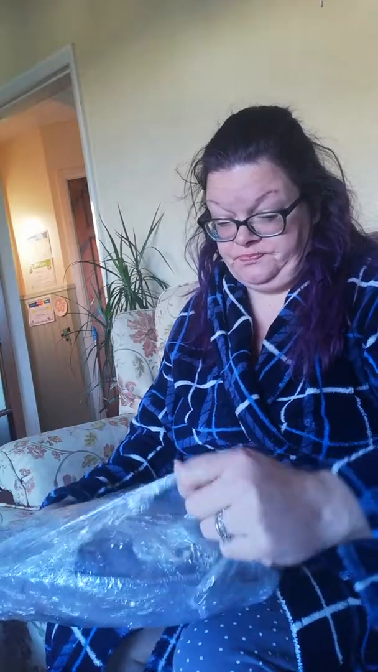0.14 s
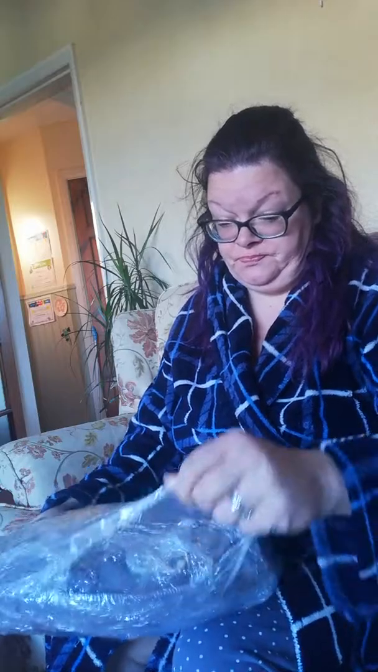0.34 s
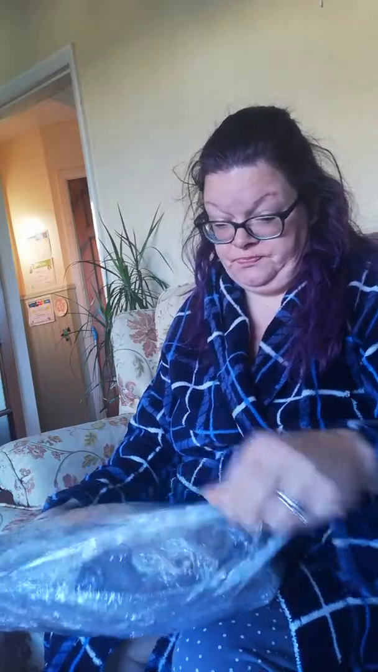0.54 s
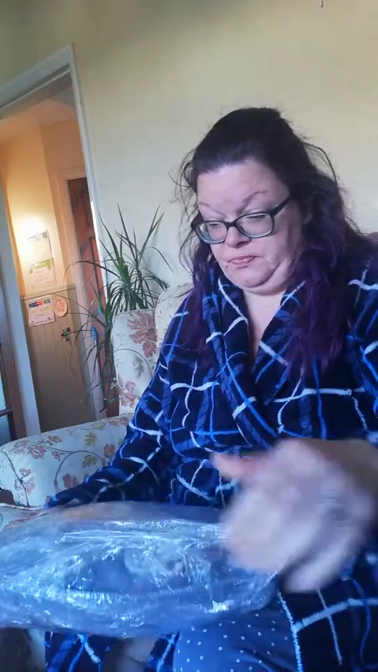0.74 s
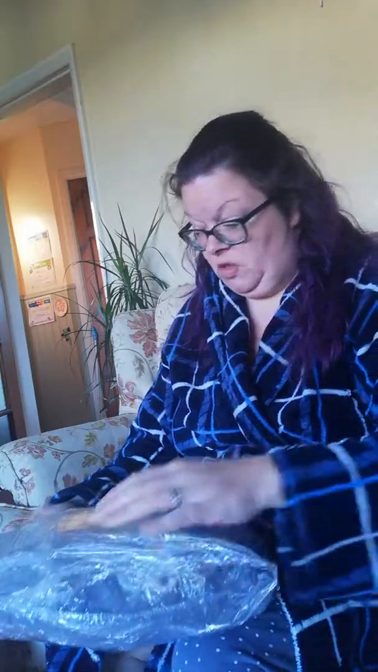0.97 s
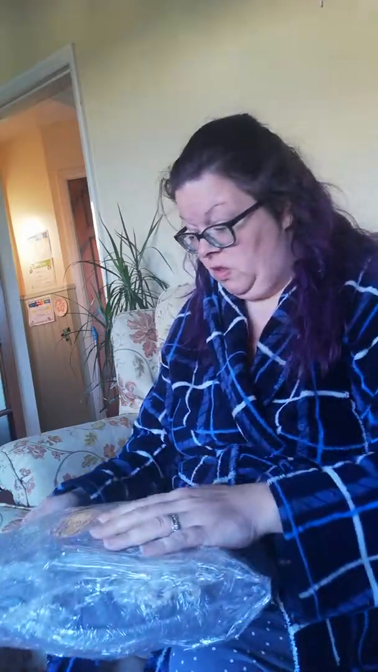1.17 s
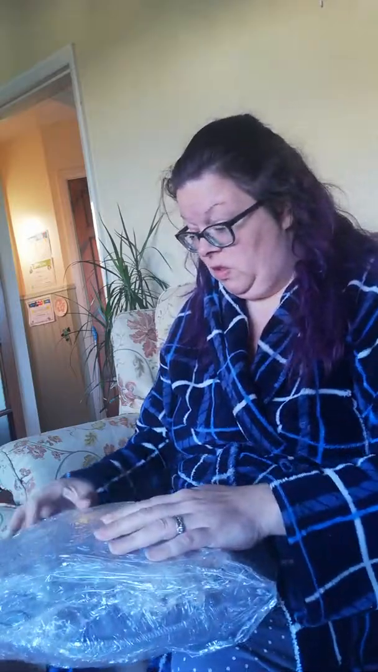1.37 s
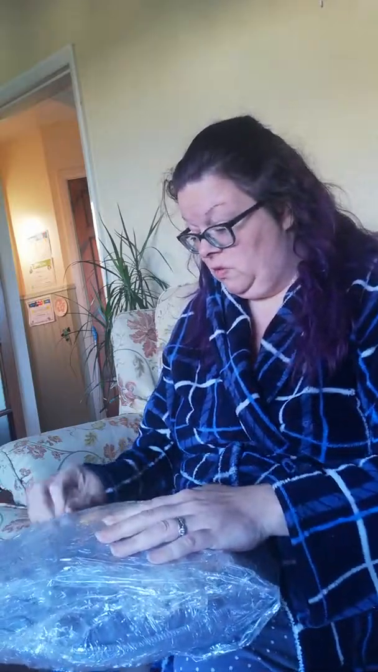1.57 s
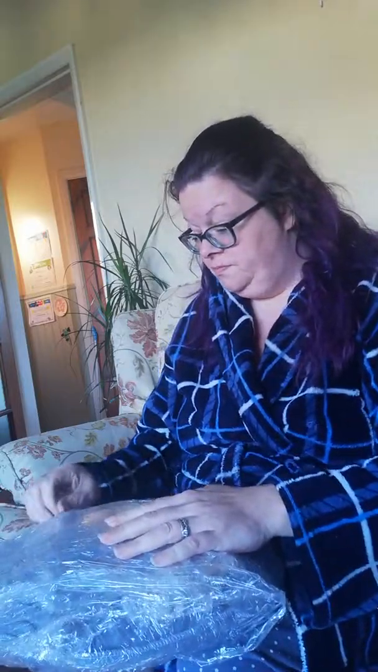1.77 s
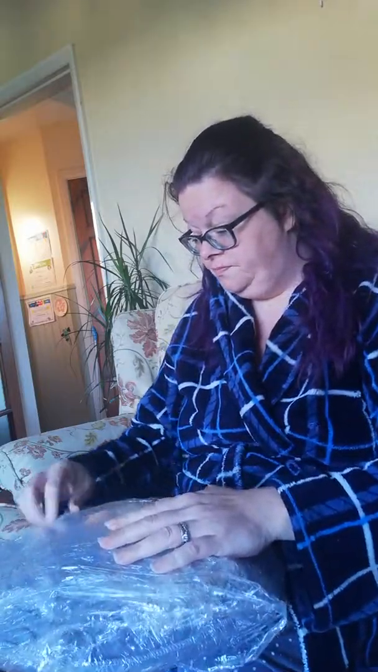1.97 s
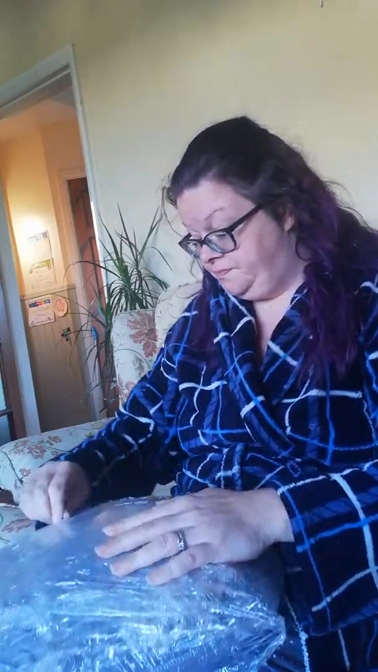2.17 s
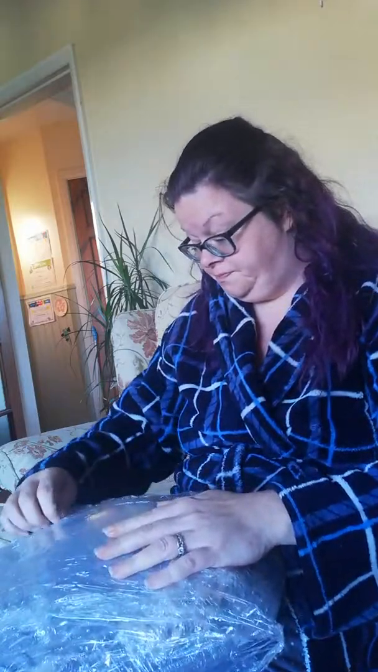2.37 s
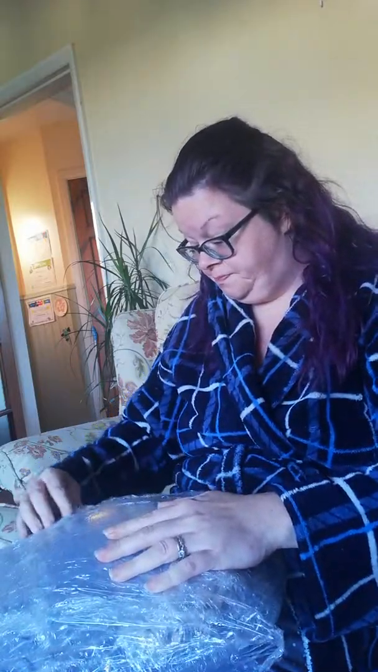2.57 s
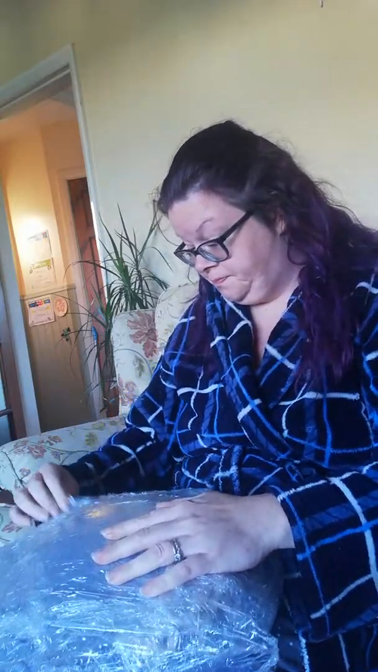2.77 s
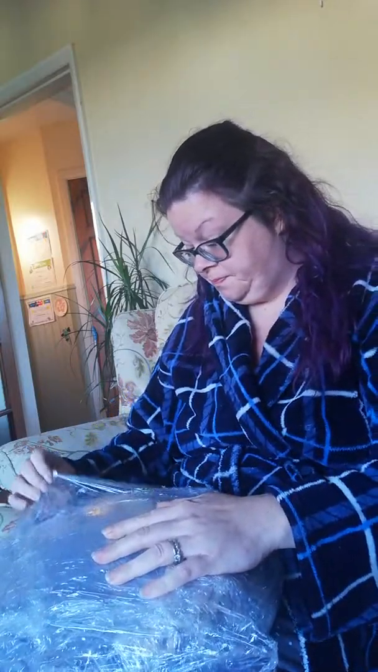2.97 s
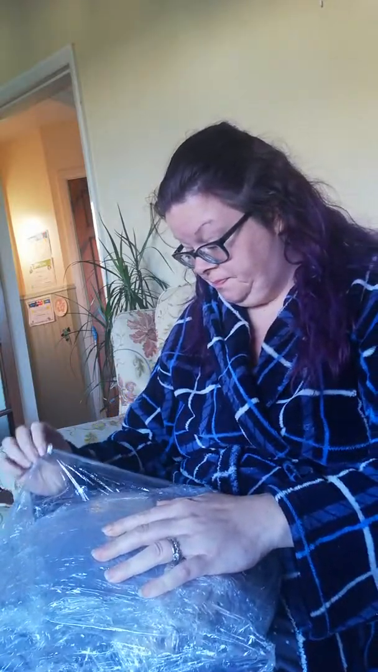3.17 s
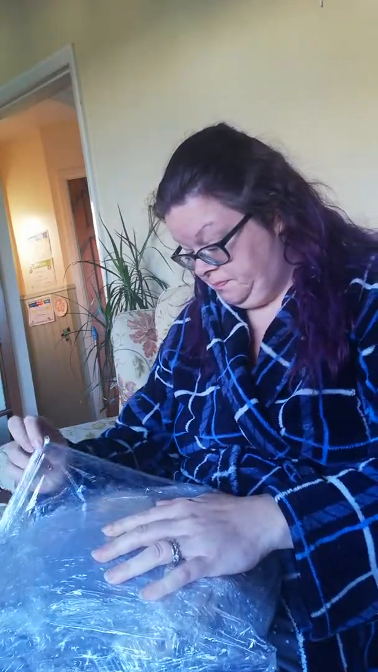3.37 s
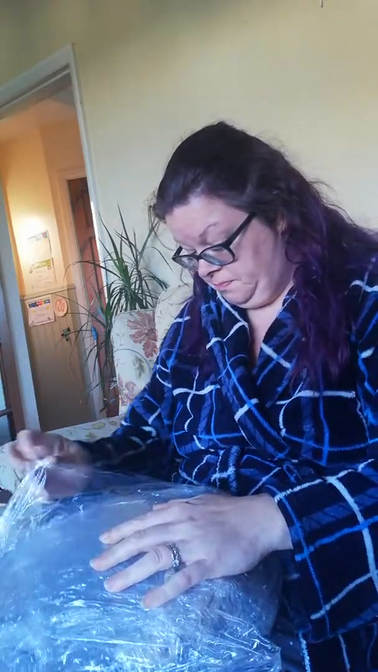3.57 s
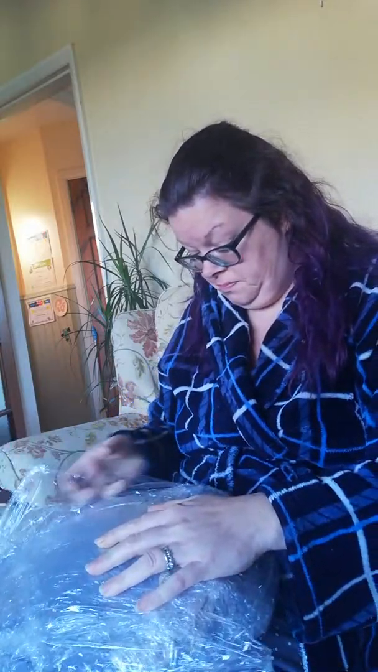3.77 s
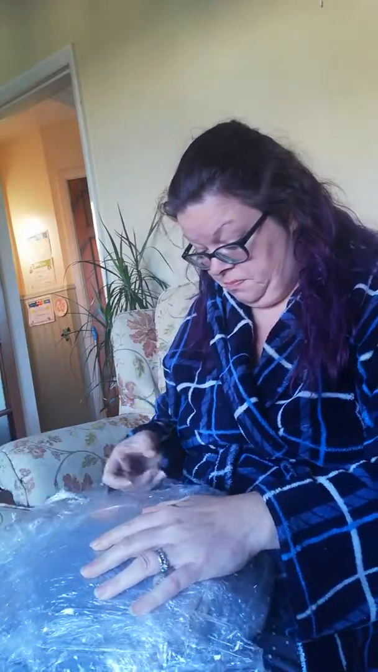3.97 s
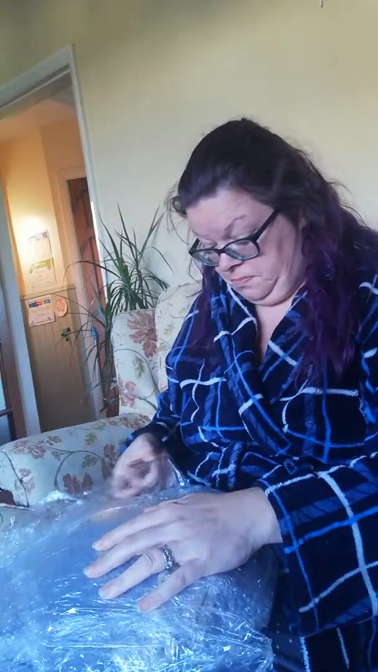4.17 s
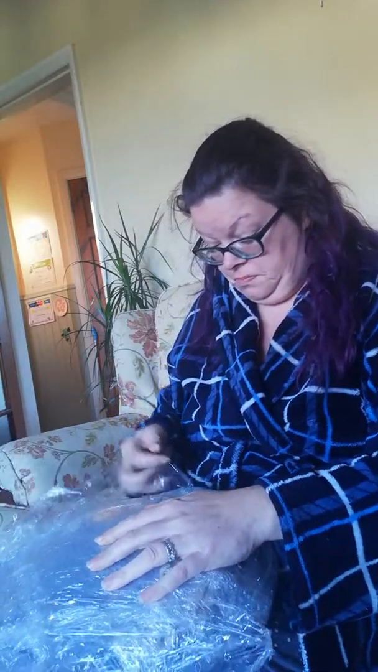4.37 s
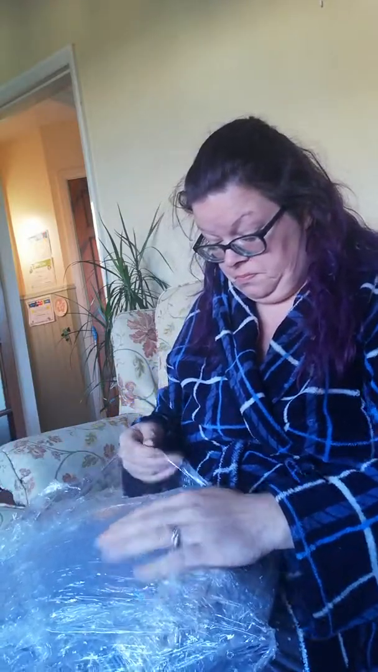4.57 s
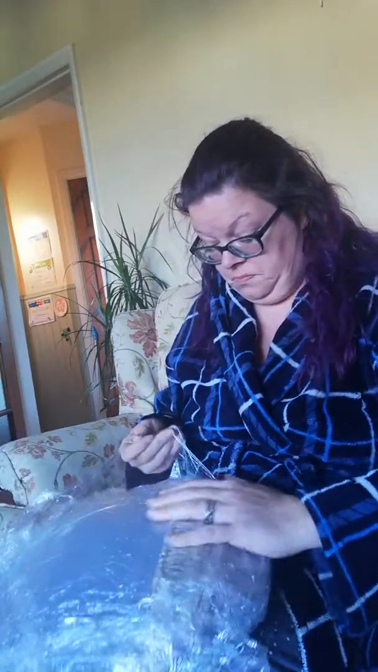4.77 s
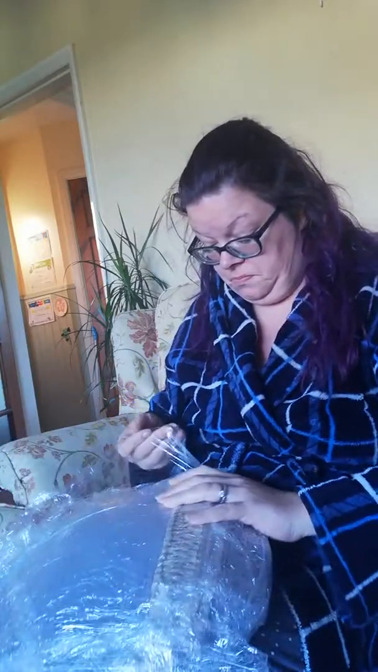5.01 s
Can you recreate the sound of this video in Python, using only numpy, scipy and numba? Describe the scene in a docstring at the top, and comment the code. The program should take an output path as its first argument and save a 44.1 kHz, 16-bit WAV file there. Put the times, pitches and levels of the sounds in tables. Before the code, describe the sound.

Close to a phone in a small furnished living room, hands handle plastic film around a bubble-wrapped parcel. Dense bright crackling and sharp snaps fill the first half second or so, then only faint rustles remain. Near three seconds the crinkling surges back, eases, and returns in smaller bursts with ticks, hollow knocks and soft low bumps. Stereo, dry, faint hiss behind.

```python
"""In a living room, close to a phone, hands pull clear plastic film off a bubble-wrapped parcel held on a lap.
Creases buckle as swarms of short noise bursts; larger folds snap as a tick, a rustle and a hollow knock.
The air-filled wrap drums softly through resonances; ringing wrap and low thumps of hands bumping the parcel
are decaying sines, and twice in quick succession taut film zings as a falling chirp. Shifting random
reflections make a short furnished room; shaped noise makes the faint rumble and hiss behind it."""
import sys
import numpy as np
from scipy import signal
from scipy.fft import rfft, irfft
from scipy.io import wavfile
from scipy.ndimage import uniform_filter1d
from numba import njit

SR = 44100
rng = np.random.default_rng(int(sys.argv[2]) if len(sys.argv) > 2 else 0)


def persist_wave(psi):
    """Save psi, clipped to +-1, as 16-bit WAV."""
    counts = np.round(np.clip(psi, -1, 1) * 32767).astype(np.int16)
    wavfile.write(sys.argv[1], SR, np.atleast_2d(counts).T)


N = 222418
TIME = np.arange(N) / SR


def undb(db):
    """Decibels to amplitude gain."""
    return 10 ** (np.asarray(db) / 20)


def curves(table):
    """Each column of a table of timed rows, interpolated at every sample."""
    s, *columns = np.transpose(table)
    return [np.interp(TIME, s, column) for column in columns]


def walk(per_s):
    """Random levels, per_s of them a second, joined by straight lines."""
    count = per_s * (N // SR + 2)
    return np.interp(TIME * per_s, np.arange(count), rng.standard_normal(count))


def add(track, s, sound):
    """Mix a sound into a track at time s, cut at the track's end."""
    i = max(int(s * SR), 0)
    track[..., i:i + sound.shape[-1]] += sound[..., :max(N - i, 0)]


def colour(x, points, size=2048):
    """Minimum-phase filter of unit energy through (hz, level_db) points."""
    hz, db = np.transpose(points)
    bin_hz = np.fft.rfftfreq(size, 1 / SR)
    gain = undb(np.interp(np.log(bin_hz + 1), np.log(hz), db))
    # folding the cepstrum onto positive time makes the response causal
    cepstrum = irfft(np.log(gain))
    cepstrum[1:size // 2] *= 2
    cepstrum[size // 2 + 1:] = 0
    response = irfft(np.exp(rfft(cepstrum)))
    response /= np.linalg.norm(response)
    return signal.fftconvolve(x, response[None], axes=1)[:, :N]


def resonate(x, modes):
    """Sum of band-pass resonances (hz, width_hz, level_db)."""
    out = 0
    for hz, width_hz, db in modes:
        b, a = signal.iirpeak(hz, hz / width_hz, fs=SR)
        out = out + undb(db) * signal.lfilter(b, a, x)
    return out


def steady(x, size=1500):
    """Hold the short-term power near one while keeping the clicks."""
    power = np.mean(x ** 2, axis=0)
    power = uniform_filter1d(uniform_filter1d(power, size), size)
    return x / np.sqrt(np.maximum(power, 0) + 1e-12)


@njit
def sweep(x, hz, damping):
    """State-variable band-pass whose centre moves."""
    y, band, low = np.empty(len(x)), 0., 0.
    for i in range(len(x)):
        g = np.tan(np.pi * hz[i] / SR)
        v = (band + g * (x[i] - low)) / (1 + g * (g + damping))
        band, low, y[i] = 2 * v - band, low + 2 * g * v, damping * v
    return y


def shiver(energy, likeness, lag_count=4):
    """Film trembles as noise of a given energy, partly alike at the two ports, the left a little later."""
    shared, left, right = rng.standard_normal((3, len(energy)))
    own = np.array([left, right])
    pair = np.sqrt(energy) * (np.sqrt(likeness) * shared + np.sqrt(1 - likeness) * own)
    pair[0] = np.pad(pair[0], (lag_count, 0))[:len(energy)]
    return pair


def crinkle():
    """Small creases fizz, broad folds crackle in the stretched film, and the air-filled wrap drums along."""
    # stretch of film between the hands: start_s, resonance_hz
    span = [(0, 3630), (.6, 3180), (1.1, 2060), (1.7, 1600), (3.45, 1490), (4.1, 1890), (4.17, 3550),
            (4.25, 2270), (4.55, 1650), (4.68, 4130), (4.75, 1520)]
    # colour of small creases: hz, level_db
    fine_colour = [(1000, -19.5), (3000, -5.5), (6000, 0), (7200, 2.5), (8300, 4), (11500, 0.5),
                   (12600, -3.5), (16000, -9)]
    # colour of broad folds: hz, level_db
    broad_colour = [(200, -40.5), (520, -5.5), (850, -3), (1600, 1), (2600, 3), (4500, 3), (7000, 4),
                    (11000, -28.5), (16000, -56.5)]
    # resonances of the padded parcel: hz, width_hz, level_db
    parcel = [(94, 5.7, -3), (148, 27, -6), (215.5, 32, -1.5), (278.7, 15.4, 3), (331, 27, -0.5),
              (367, 8.2, -7)]
    fine_db, broad_db, drum_db = 20 * np.log10(handling())
    span_hz, = curves(span)
    pace = undb(.2 * (fine_db + 32))  # harder handling buckles more creases a second
    small = buckles(per_s=1700 * pace, spread_db=3.5, limit_db=17, swarm_db=1.5,
                    decay_s=0.00013, linger=0.0054, linger_s=0.03)
    large = buckles(per_s=600 * pace, spread_db=7.0, limit_db=20.5, swarm_db=-3.5,
                    decay_s=0.00094, linger=0.055, linger_s=0.022)
    fine = steady(colour(small, fine_colour)) * undb(fine_db - 4.0)
    folds = colour(steady(large) + 0.68 * steady(small), broad_colour)
    ringing = np.array([sweep(x, span_hz, 0.2) for x in folds])
    facing = np.array([[1.5], [.3]])  # the stretch faces the left port
    broad = steady(folds + facing * ringing) * undb(broad_db - 0.64)
    struck = large.mean(axis=0) + 1.9 * large
    drum = steady(resonate(struck, parcel)) * undb(drum_db - 3.5)
    return fine, broad, drum


def buckles(per_s, spread_db, limit_db, swarm_db, decay_s, linger, linger_s):
    """Many small and few large buckles in swarms, each dying fast with a weak after-rustle."""
    fires = rng.random(N) < per_s / SR
    size_db = np.minimum(spread_db * rng.standard_exponential(N), limit_db)
    released = (fires * undb(size_db + swarm_db * walk(per_s=140))) ** 2
    energy = signal.lfilter([1], [1, -np.exp(-2 / SR / decay_s)], released)
    energy += linger * signal.lfilter([1], [1, -np.exp(-2 / SR / linger_s)], released)
    return shiver(energy, likeness=0.28)


def handling():
    """Strengths of fine crinkle, broad crackle and drumming; strokes and jolts add in power."""
    # strokes of the hands, relative levels: start_s, rise_s, hold_s, fine_db, broad_db
    strokes = [(-.03, 0.011, 0.055, -20.5, -30.5), (0.088, .02, 0.033, -33.5, -49),
               (0.124, .02, 0.064, -27.5, -36.5), (0.225, 0.0091, 0.0087, -22.5, -35.5),
               (0.264, 0.014, 0.028, -26.5, -34.5), (0.33, 0.028, 0.051, -27, -35.5),
               (0.413, 0.027, 0.0083, -23.5, -37), (0.48, 0.018, 0.079, -33, -42),
               (0.589, 0.016, 0.056, -28, -42.5), (0.81, 0.018, 0.15, -69, -85),
               (0.933, 0.16, .03, -39, -55.5), (1.109, 0.024, 0.0074, -37.5, -47),
               (1.203, 0.095, 0.04, -41, -53), (1.473, 0.1, 0.15, -41.5, -56.5),
               (1.794, 0.025, 0.09, -49, -62), (2.012, .012, 0.092, -45.5, -62),
               (2.164, 0.044, .05, -40.5, -55), (2.291, 0.045, 0.017, -38.5, -77),
               (2.382, 0.016, .04, -44.5, -82), (2.483, 0.055, 0.21, -41.5, -54.5),
               (2.647, .008, 0.029, -47, -45.5), (2.681, 0.036, 0.14, -38, -54.5),
               (2.805, .105, 0.039, -22.5, -32), (2.977, .025, 0.021, -29, -35.5),
               (3.044, 0.011, 0.075, -25, -33), (3.108, 0.037, 0.013, -22.5, -28),
               (3.177, 0.038, 0.12, -31.5, -39.5), (3.339, 0.042, 0.032, -27, -36.5),
               (3.412, .03, 0.064, -34, -44.5), (3.542, 0.094, 0.017, -40, -48.5),
               (3.784, 0.042, 0.23, -36.5, -45), (3.973, 0.028, 0.016, -30.5, -47),
               (4.046, 0.052, 0.03, -30.5, -40), (4.135, 0.031, 0.014, -28, -39),
               (4.24, .006, 0.018, -31, -42.5), (4.313, .005, 0.014, -42, -52),
               (4.355, 0.011, 0.12, -38.5, -50), (4.483, .05, .035, -35.5, -44.5),
               (4.622, 0.043, 0.04, -30, -32.5), (4.722, 0.046, 0.021, -30.5, -37),
               (4.822, 0.017, 0.055, -37, -45), (4.913, 0.045, 0.08, -43, -49)]
    # jolts that shake the whole parcel, relative levels: start_s, drum_db
    jolts = [(0, -39.5), (0.133, -38), (0.199, -42.5), (.255, -41.5), (0.306, -41.5), (0.358, -36.5),
             (0.411, -41), (0.488, -42), (.58, -44.5), (.64, -49.5), (.68, -49), (2.91, -41.5), (2.97, -46),
             (3.089, -39.5), (3.13, -38.5), (3.17, -39.5), (3.248, -41), (3.35, -51), (3.628, -54),
             (3.819, -52.5), (3.99, -46.5), (4.103, -47.5), (4.493, -47.5), (4.642, -44.5), (4.72, -45.5),
             (4.775, -44)]
    resting_fine_db, resting_broad_db = -52.5, -62.5  # resting hands keep the film faintly astir
    drum_follow_db = -17.5  # the wrap drums along with the broad folds
    fine, broad, drum = undb(resting_fine_db) ** 2, undb(resting_broad_db) ** 2, 0
    for s, rise_s, hold_s, fine_db, broad_db in strokes:
        push = effort(s, rise_s, hold_s, relax_s=0.043)
        fine = fine + (push * undb(fine_db)) ** 2
        broad = broad + (push * undb(broad_db)) ** 2
    for s, db in jolts:
        jolt = effort(s, rise_s=0.0077, hold_s=0.0096, relax_s=0.025)
        drum = drum + (jolt * undb(db)) ** 2
    return np.sqrt([fine, broad, drum + broad * undb(drum_follow_db) ** 2])


def effort(start_s, rise_s, hold_s, relax_s):
    """One push: it builds up, holds, and relaxes exponentially."""
    age_s = TIME - start_s
    rise = np.sin(np.pi / 2 * np.clip(age_s / rise_s, 0, 1)) ** 2
    return rise * np.exp(-np.maximum(age_s - rise_s - hold_s, 0) / relax_s)


def snaps(tick_db, tick_s, rustle_db, rustle_s, knock_db, knock_s):
    """A large fold gives way: a sharp tick with a weak longer rustle, and a hollow knock of the sheet."""
    # single folds snapping, relative levels: time_s, tick_db, knock_db
    folds = [(0.1373, -13, -41.5), (0.1745, -7.5, -43), (0.2349, -5.5, -49), (0.3102, -13, -41.5),
             (0.3493, -6.5, -51), (0.3744, -9, -54), (0.3927, -9.5, -53), (0.3972, -8, -45),
             (0.4939, -7.5, -34), (0.5302, -13, -46), (0.556, -15, -50), (0.8086, -38.5, -64),
             (2.0108, -49, -62), (2.175, -28, -47), (2.654, -36, -46.5), (3.049, -23, -40),
             (3.0931, -16, -34.5), (3.1336, -14, -35.5), (3.256, -15, -37), (3.6341, -26, -46.5),
             (3.804, -34, -48), (3.9381, -21, -42.5), (3.9912, -25, -47), (4.0148, -17, -49),
             (4.1071, -14.5, -34.5), (4.1463, -14.5, -44), (4.241, -21.5, -47), (4.2528, -16, -44.5),
             (4.3075, -24, -51), (4.4937, -27, -42), (4.6298, -23, -34.5), (4.7343, -18.5, -39),
             (4.776, -17, -31), (4.8964, -33, -45), (4.9685, -23, -43.5), (5.0058, -32, -44.5)]
    # colour of the tick: hz, level_db
    tick_colour = [(500, -28.5), (1800, -9.5), (3000, -3.5), (7000, 0.5), (11000, 1.5), (13000, -1.5),
                   (16000, -13)]
    # colour of the knock: hz, level_db
    knock_colour = [(80, -35), (300, -19), (550, 2.5), (950, 13.5), (1700, 11.5), (3000, -5.5), (7000, -63),
                    (16000, -5)]
    ticks, knocks = np.zeros((2, 2, N))
    for s, sharp_db, hollow_db in folds:
        start_s = s + .001  # each snap starts 1 ms after its listed time
        tick = facet(tick_s, likeness=0.26) + undb(rustle_db) * facet(rustle_s, likeness=0.33)
        add(ticks, start_s, tick * undb(sharp_db + tick_db))
        add(knocks, start_s, facet(knock_s, likeness=0.12) * undb(hollow_db + knock_db))
    return colour(ticks, tick_colour), colour(knocks, knock_colour)


def facet(decay_s, likeness, size=600):
    """One facet of film flipping: a brief shiver of unit energy at each port."""
    pair = shiver(np.exp(-2 * np.arange(size) / SR / decay_s), likeness)
    return pair / np.linalg.norm(pair, axis=1, keepdims=True)


def zings(start_hz, size=1200, lag_count=4):
    """High bending waves outrun low ones, so a snap far along taut film arrives as a falling chirp."""
    # bending waves: start_s, level_db, pitch_halving_s
    waves = [(4.3635, -32, .007), (4.3718, -29, .007)]
    out, t = np.zeros(N), np.arange(size) / SR
    for s, db, halving_s in waves:
        age = t / halving_s
        phase = 2 * np.pi * np.cumsum(start_hz / (1 + age)) / SR
        swell = age * np.exp(-3 * age)
        add(out, s, undb(db) * swell / swell.max() * np.sin(phase))
    return np.array([np.roll(out, lag_count), out / 2])  # it runs along the left side


def rings_and_thumps():
    """Pockets of wrap ring and hands bump the parcel with low thumps: decaying sines."""
    # rings and low thumps: start_s, pitch_hz, level_db, t60_s
    tones = [(0.058, 292, -36.5, 0.2), (.385, 124, -42, 0.083), (0.388, 360, -38, .1),
             (1.24, 300, -59, 0.11), (3.144, 240, -38.5, 0.22), (4.496, 107, -39.5, 0.026),
             (4.643, 283, -39, 0.25), (4.649, 1910, -33.5, 0.11), (4.778, 85.4, -41.5, 0.13),
             (4.968, 622, -50.5, 0.16)]
    out, t = np.zeros((2, N)), np.arange(SR // 4) / SR
    for s, hz, db, t60_s in tones:
        add(out, s, undb(db - 60 * t / t60_s) * np.sin(2 * np.pi * hz * t))
    return out


def room(x, size=16384):
    """The hands wander from spot to spot, so the pattern of reflections keeps shifting."""
    out, padded = x.copy(), np.pad(x, ((0, 0), (0, size)))
    fade = np.sin(np.pi * np.arange(size) / size)  # half-overlapping, equal power
    for i in range(0, N, size // 2):
        share = fade if i else np.maximum(fade, np.arange(size) < size // 2)
        response = reflections(early_db=-3.5, early_s=0.0034, tail_db=-9.5, t60_s=0.093)
        add(out, i / SR, signal.fftconvolve(padded[:, i:i + size] * share, response, axes=1))
    return out


def reflections(early_db, early_s, tail_db, t60_s):
    """Response from one spot: scatter off lap and sofa, then a short tail; the cushions swallow the bass."""
    t = np.arange(SR // 3) / SR
    near, far = rng.standard_normal((2, 2, len(t)))
    early = near * (rng.random(near.shape) < .04) * (t > .001) * np.exp(-t / early_s)
    tail = signal.lfilter([1, .4], [1], far) * (t > .008) * undb(-60 * t / t60_s)
    early *= undb(early_db) / np.linalg.norm(early, axis=1, keepdims=True)
    tail *= undb(tail_db) / np.linalg.norm(tail, axis=1, keepdims=True)
    bass_cut = signal.butter(2, 280, "high", fs=SR, output="sos")
    return signal.sosfilt(bass_cut, early + tail)


def long_waves(x, hz):
    """Long waves reach both ports alike: the difference between them fades out in the bass."""
    mid, side = (x[0] + x[1]) / 2, (x[0] - x[1]) / 2
    f = np.fft.rfftfreq(N, 1 / SR)
    side = irfft(rfft(side) * f ** 2 / (f ** 2 + hz ** 2), N)
    return np.array([mid + side, mid - side])


def background(level_db):
    """Faint wavering noise: rumble alike at both ports, hiss above it that differs between them."""
    # spectrum of the quiet room: hz, density_db_per_hz (relative)
    quiet = [(25, -5), (60, -2), (150, -7), (300, -15.5), (600, -23), (2000, -14.5), (8000, -15.5),
             (16000, -23)]
    mid, side = colour(rng.standard_normal((2, N)), quiet)
    side = signal.sosfilt(signal.butter(1, 500, "high", fs=SR, output="sos"), side)
    waver_db = 1.8 * walk(per_s=5)
    return undb(level_db + waver_db) * np.array([mid + side, mid - side])


def scene():
    """The phone's body shades the treble of the far port more than the middle range."""
    # where the film is worked: start_s, left_minus_right_db (before the offset below)
    place = [(0, -8), (.7, -5), (1, 1), (2.6, 2.5), (3.4, 0), (4.55, 2), (5.04, -1.5)]
    fine, broad, drum = crinkle()
    ticks, knocks = snaps(tick_db=8.0, tick_s=0.00075, rustle_db=-27, rustle_s=0.0096,
                          knock_db=24.0, knock_s=0.00054)
    pan_db, = curves(place)
    shade_db = np.array([[.5], [-.5]]) * (pan_db - 1.8)
    treble = (fine + ticks + zings(start_hz=13600)) * undb(shade_db)
    middle = (broad + knocks) * undb(0.05 * shade_db)
    parcel_sound = room(treble + middle + drum + rings_and_thumps())
    return long_waves(parcel_sound, hz=127) + background(level_db=-60)


def record(dry):
    """Each microphone port adds its own resonance; the highest peaks are rounded and the top is cut."""
    # left and right port, a list of resonances each: hz, width_hz, level_db
    ports = [
        [(9470, 1520, 7.5)],
        [(11100, 1730, 0)],
    ]
    ported = np.array([x + resonate(x, modes) for x, modes in zip(dry, ports)])
    rounded = .8 * np.tanh(ported / .8)
    top_hz, ripple_db, stop_db = 15800, .2, 90
    top_cut = signal.ellip(10, ripple_db, stop_db, top_hz, fs=SR, output="sos")
    return signal.sosfilt(top_cut, rounded)


dry = scene()
out = record(dry)
persist_wave(out)
```